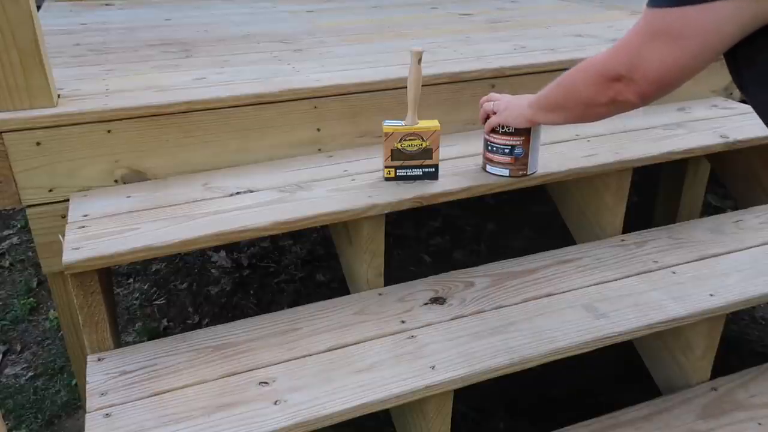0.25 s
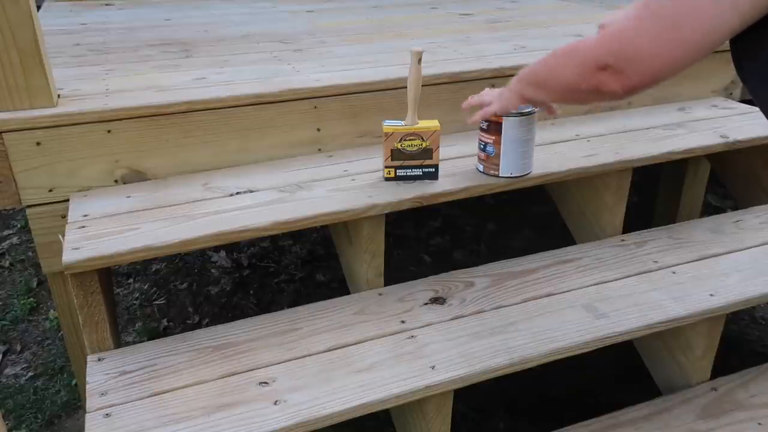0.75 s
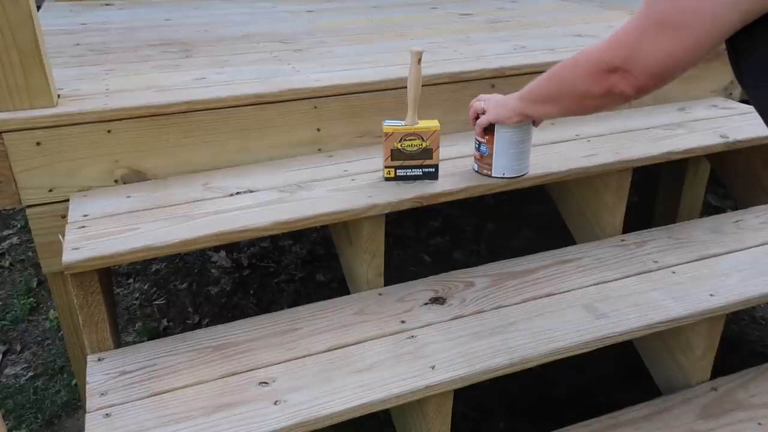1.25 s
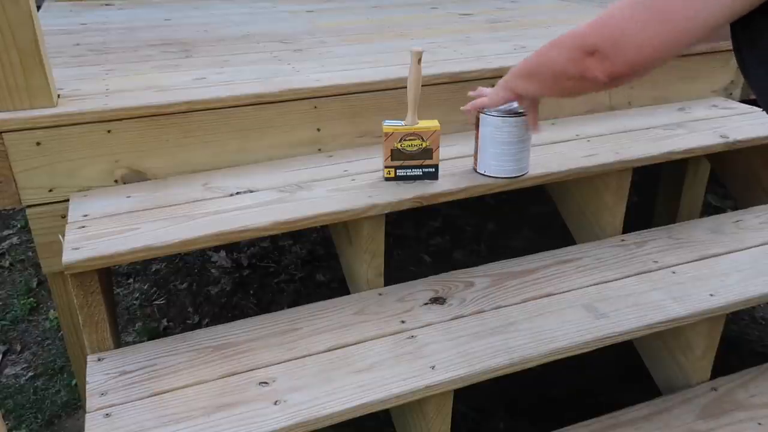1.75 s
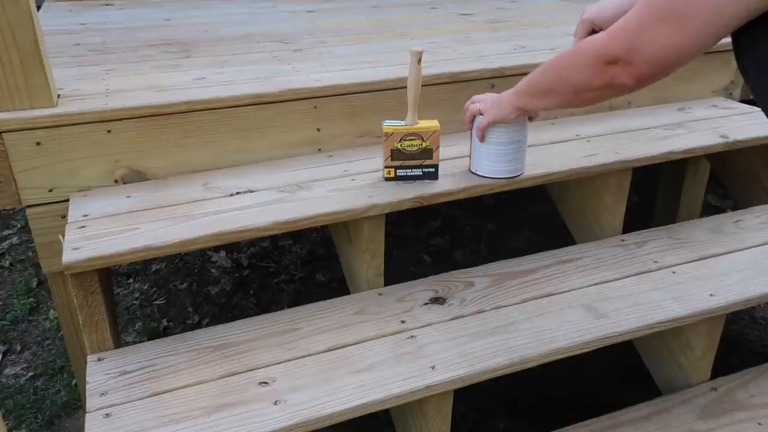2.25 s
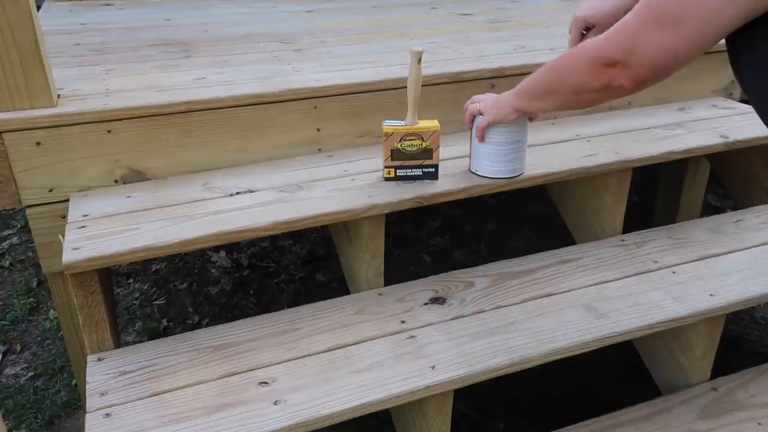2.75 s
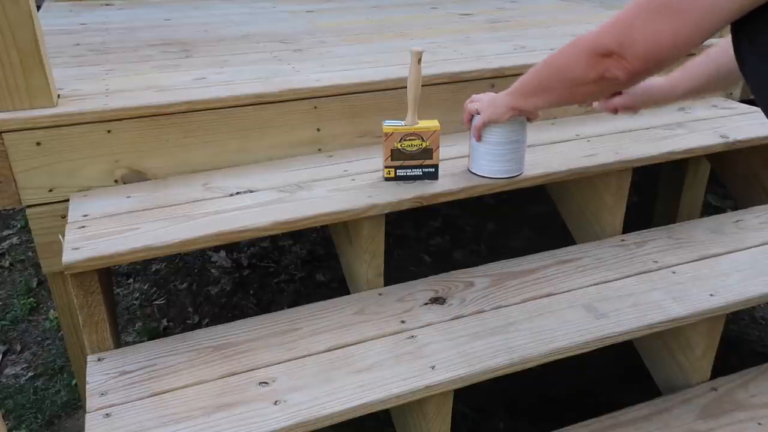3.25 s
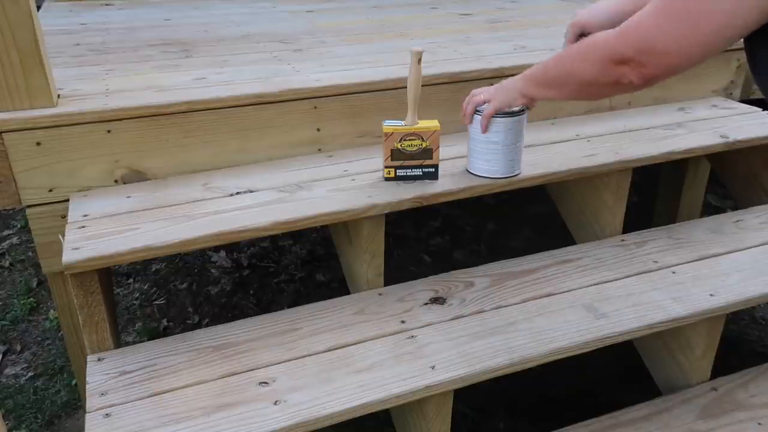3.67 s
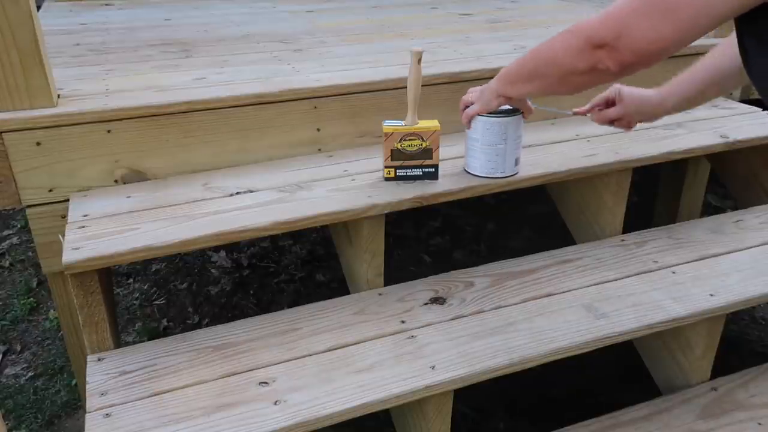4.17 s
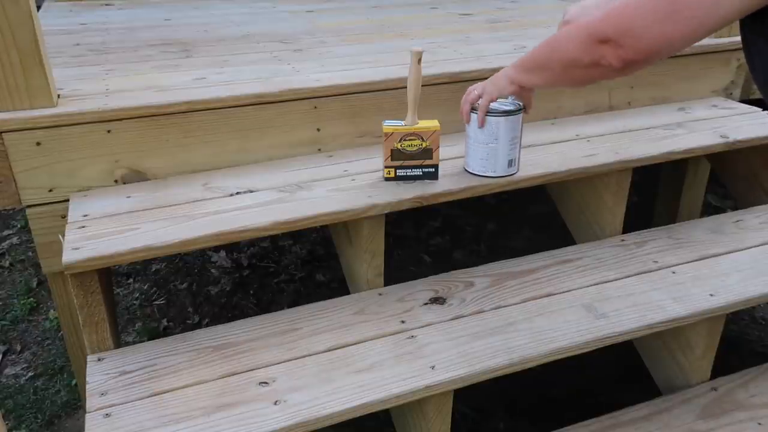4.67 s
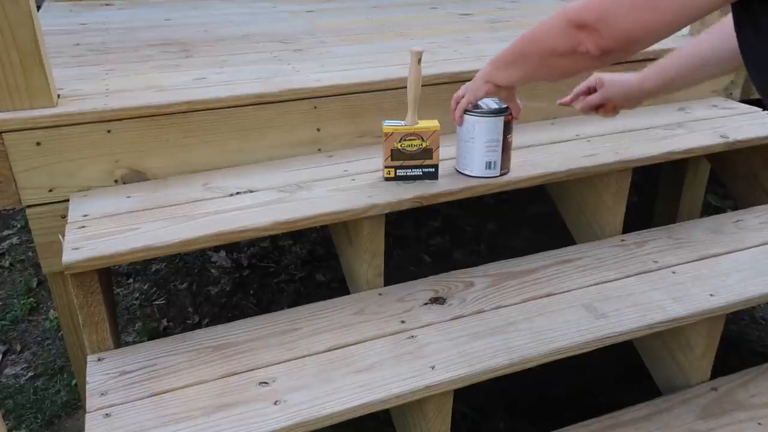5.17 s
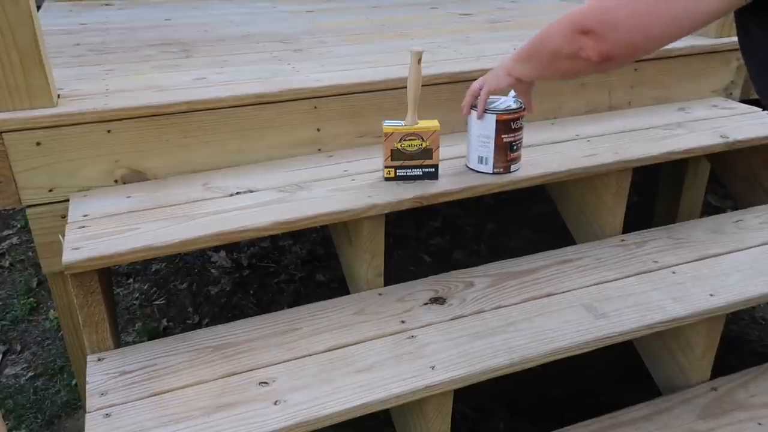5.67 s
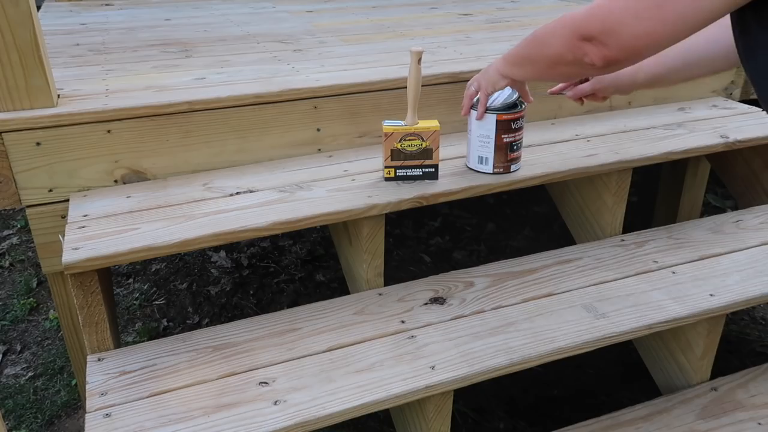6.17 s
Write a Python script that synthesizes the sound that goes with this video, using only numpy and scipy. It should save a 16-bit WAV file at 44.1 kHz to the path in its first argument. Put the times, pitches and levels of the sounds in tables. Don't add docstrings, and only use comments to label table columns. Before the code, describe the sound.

Quiet outdoor air with distant traffic, thin high insects and light wind. At 0.24 s a tin lid springs free with a loud, sharp pop, hollow and briefly ringing, by far the loudest event. Faint rubbing follows, then the can knocks on the wooden step around 0.65 to 0.95 s, ending in a firm thud with a clink. Soft rubs at 1.7 s and small ticks near 1.95 s lead to a bright clink at 2.2 s and another at 2.5 s, with a wooden knock at 2.66 s. A low wind puff swells at 3.25 s; a knock falls at 3.4 s, then light scrapes and nudges through 5 s. At 5.35 to 5.5 s the can creaks tinnily over a wind thump, then knocks. A stronger knock at 6.0 s, scrapes and crisp metal clicks run until 6.4 s. Close stereo pickup, short hard reflection.

```python
import sys
import numpy as np
from scipy import signal
from scipy.fft import rfft, irfft
from scipy.io import wavfile
from scipy.ndimage import uniform_filter1d

SR = 44100
rng = np.random.default_rng(int(sys.argv[2]) if len(sys.argv) > 2 else 0)


def decibels_to_gain(level_db):
    exponent = np.asarray(level_db, float) / 20
    return 10 ** exponent


def bounce(signal):
    frames = np.transpose(np.atleast_2d(signal))
    limited = np.clip(frames, -1, 1)
    pcm = np.round(limited * 32767).astype(np.int16)
    wavfile.write(sys.argv[1], SR, pcm)


N = 283417
T = np.arange(N) / SR
RIM_HZ = 5230
MID_HZ, HIGH_HZ = (2500, 7000), (7000, 15000)


def on_log(hz, table):
    f, v = np.transpose(table)
    return np.interp(np.log(np.maximum(hz, 1)), np.log(np.maximum(f, 1)), v)


def colour(x, table):
    n = x.shape[-1]
    return irfft(rfft(x) * decibels_to_gain(on_log(np.fft.rfftfreq(n, 1 / SR), table)), n)


def band(x, lo_hz, hi_hz, order=2):
    sos = signal.butter(order, [lo_hz, min(hi_hz, .45 * SR)], "band", fs=SR, output="sos")
    return signal.sosfilt(sos, x)


def level(x, db):
    return x * decibels_to_gain(db) / np.sqrt(np.mean(x ** 2))


def peak(x, db):
    return x * decibels_to_gain(db) / np.max(np.abs(x))


def walk(rate):
    k = int(SR / rate)
    held = np.repeat(rng.standard_normal(N // k + 1), k)
    return 1.316 * uniform_filter1d(uniform_filter1d(held, k), k)[:N]


def ring(modes, t):
    return sum(decibels_to_gain(db) * np.sin(2 * np.pi * hz * t) * decibels_to_gain(-60 * t / t60) for hz, db, t60 in modes)


def burst(t, t60):
    return rng.standard_normal(len(t)) * decibels_to_gain(-60 * t / t60)


def add(out, x, s):
    i = int(round(s * SR))
    out[i:i + len(x)] += x[:N - i]


def jingle(t, lo_hz, hi_hz, t60, count):
    hz, db, life = rng.random((3, count))
    return ring(zip(lo_hz * (hi_hz / lo_hz) ** hz, -10 * db, t60 * (.5 + life)), t)


def contact(t, length):
    x = t / length
    return rng.standard_normal(len(t)) * x * np.exp(-3 * x)


def pressure(length, shape):
    return np.hanning(max(int(length * SR), 2)) ** (shape / 2)


def yard():
    # f/Hz, level/dB per Hz
    traffic = [(15, -68), (25, -15), (40, -30), (58, -3), (120, -1), (206, -7), (229, -5), (394, -7.5),
               (503, -8.5), (677, -14.5), (962, -17.5), (1290, -16.5), (5730, -31), (12900, -47.5),
               (16000, -57)]
    # f/Hz, level/dB
    spread = [(60, -61), (110, -20), (200, -5.5), (380, -7.5), (700, -1.5), (1290, -3.5), (2380, -5),
              (4400, -3), (8120, -2), (15000, 5)]
    # f/Hz, level/dB
    balance = [(60, 4.5), (110, 0.5), (200, -1.5), (380, 0), (700, -4.5), (1290, -2), (2380, 0),
               (4400, -1.5), (8120, 0.7), (15000, -1)]
    # f/Hz, width/Hz, level/dB
    songs = [(5730, 400, -69), (13000, 300, -86)]
    hz = np.fft.rfftfreq(N, 1 / SR)
    mid = rfft(rng.standard_normal(N)) * decibels_to_gain(on_log(hz, traffic))
    side = rfft(rng.standard_normal(N)) * decibels_to_gain(on_log(hz, traffic) + on_log(hz, spread))
    scale = decibels_to_gain(-50) / np.std(irfft(mid * (hz > 200), N))
    octave = np.log2(np.maximum(hz, 20) / 20)
    out = 0
    for k in np.arange(11):
        part = np.clip(1 - np.abs(octave - k), 0, 1)
        m, s = irfft(mid * part, N), irfft(side * part, N)
        pan_db = on_log(20 * 2. ** k, balance) * np.array([[.5], [-.5]])
        out = out + decibels_to_gain(1.24 * walk(14) + pan_db) * np.array([m + s, m - s])
    insects = 0
    for f, w, db in songs:
        song = band(rng.standard_normal((2, N)), f - w / 2, f + w / 2) * decibels_to_gain(0.8 * walk(14))
        insects = insects + level(song, db)
    return scale * out * decibels_to_gain(1.8 * walk(1.57)) + insects


def wind():
    # f/Hz, level/dB per Hz
    spectrum = [(12, -45), (20, -6.5), (60, 6.5), (118, 1.5), (286, -14.5), (397, -40), (499, -57),
                (600, -21), (780, -68), (1320, -120)]
    # middle t/s, peak level/dB, half width/s
    gusts = [(.03, -53, 0.041), (.33, -48, 0.14), (.52, -50, 0.033), (1.34, -44, 0.035), (1.52, -53, .025),
             (1.61, -39.5, 0.027), (1.86, -48.5, 0.048), (2.17, -51, 0.037), (2.33, -45, 0.019),
             (2.98, -50, .05), (3.12, -54, 0.021), (3.26, -31.5, 0.077), (3.52, -56, 0.016),
             (3.82, -49, 0.057), (4.1, -45, 0.047), (4.47, -43, 0.012), (4.59, -49, 0.052),
             (4.87, -57, 0.077), (5.27, -51, 0.026), (5.385, -44, 0.023)]
    # t/s, level/dB
    breeze = [
        (0, -52),
        (2.6, -50),
        (4.2, -51.5),
        (5.5, -55),
        (6.43, -57),
    ]
    both, apart = (level(colour(rng.standard_normal(N), spectrum) * decibels_to_gain(0.6 * walk(24.8)), 0)
                   for _ in range(2))
    puffs = sum(decibels_to_gain(db) * np.exp(-((T - s) / width) ** 2) for s, db, width in gusts)
    db = 20 * np.log10(decibels_to_gain(np.interp(T, *np.transpose(breeze))) + puffs)
    share = np.clip(decibels_to_gain(-6 + 0.74 * (db + 44.5)), 0, 1.2)
    common = both * decibels_to_gain(np.array([[-.8], [.8]]))
    opposed = share * band(apart, 110, 340) * np.array([[1], [-1]])
    return decibels_to_gain(db) * (common + opposed)


def rubs():
    # t/s, peak level 2-7 kHz/dB, blade ring f/Hz, level above 7 kHz/dB, length/s
    slides = [(0.17, -54, 2600, -10, 0.022), (0.7095, -44.5, 5020, 5.5, 0.015),
              (0.87, -41.5, 3660, -4, 0.022), (1.708, -41, 2480, -4, 0.023), (1.75, -37, 2480, -10, 0.013),
              (2.049, -47.5, 3500, -15, 0.04), (2.218, -57, 3820, -5, 0.016), (2.368, -45, 2470, -12, 0.01),
              (2.655, -44, 2220, -8, 0.0083), (2.943, -51, 2950, -7, 0.033), (3.5, -48, 3690, -14, 0.041),
              (3.753, -47.5, 4800, -10, 0.03), (4.42, -50, 4500, -26, 0.018), (5.42, -47, 2270, -8, 0.0067),
              (5.926, -41, 2400, -11, 0.01), (6.126, -42.5, 2270, -13, 0.0076),
              (6.162, -46, 3200, -8, 0.037), (6.287, -41.5, 2550, -21, 0.011)]
    out, t = np.zeros(N), T[:SR // 6]
    for s, db, blade_hz, top_db, length in slides:
        force = contact(t, length) * decibels_to_gain(1.2 * rng.exponential(size=len(t)))
        modes = [(blade_hz, 0, .018), (1.91 * blade_hz, -11, .008), (RIM_HZ, -11, .008)]
        sung = signal.fftconvolve(force, ring(modes, t[:2000]))[:len(t)]
        rasp = peak(sung, -1) + peak(band(force, 1500, 7000), -5)
        add(out, peak(rasp, db) + peak(band(force, *HIGH_HZ), db + top_db), s)
    return out


def knocks():
    # t/s, peak level/dB, board ring f/Hz, can wall minus board level/dB, contact time/s
    blows = [(0.237, -26, 370, 0.5, 0.014), (0.656, -29.5, 340, -3.5, 0.032),
             (0.723, -32.5, 297, -5.5, 0.038), (0.857, -28.5, 316, -5.5, 0.051),
             (0.886, -38, 400, -8, 0.0053), (0.955, -19.5, 303, 0.5, 0.028), (2.188, -37, 447, -6, 0.03),
             (2.6583, -24.5, 292, 0, 0.0054), (3.3905, -26, 368, -1.5, 0.028),
             (3.637, -31.5, 278, -5.5, 0.034), (3.993, -37, 370, 2, 0.021), (5.4954, -27, 402, -11, 0.0069),
             (5.922, -30, 350, -6, 0.035), (5.986, -20.5, 374, -4, 0.027), (6.391, -38, 293, 5, 0.004)]
    # t/s, peak level/dB, board ring f/Hz
    nudges = [(1.971, -47, 390), (2.533, -38.5, 432), (2.62, -36, 287), (2.975, -36, 284),
              (3.687, -37.5, 326), (4.039, -35.5, 306), (4.432, -36.5, 370), (4.46, -49, 282),
              (4.508, -37.5, 385), (4.835, -37.5, 395), (5.005, -39, 357)]
    # f/Hz, level/dB, t60/s
    wood = [(290, 0, .07), (335, -2, .07), (402, -2, .07), (470, -4, .05), (600, -3, .06), (690, -2, .06),
            (800, -6, .045)]
    can_hz, nudge_can_db, nudge_s = 658.5, -4.5, 0.02
    out, t = np.zeros(N), T[:SR // 4]
    for s, db, board_hz, can_db, length in blows + [row + (nudge_can_db, nudge_s) for row in nudges]:
        spot_db = -5 + 1.0 * rng.standard_normal(len(wood))
        others = [(hz, d + u, t60) for (hz, d, t60), u in zip(wood, spot_db)]
        force = rng.standard_normal(4000) * np.exp(-(t[:4000] / length) ** 2)
        force *= np.minimum(t[:4000] / 0.0041, 1)
        force[:40] += 1.18 * np.hanning(40)
        board = signal.fftconvolve(ring([(board_hz, 0, .065)] + others[:4], t), force)
        can = signal.fftconvolve(ring([(can_hz, -2, .04)] + others[4:], t), force)
        add(out, peak(band(board, 305, 690), db) + peak(band(can, 310, 4700), db + can_db), s)
        add(out, peak(band(force, 220, 960), db - 13.5), s)
    return out


def pop():
    # t/s, peak level/dB
    release = [
        (0.2379, -2.5),
    ]
    # f/Hz, level/dB, t60/s
    lid = [(627, 1, 0.18), (635, 1.5, 0.16), (876, -6, 0.07), (896, -15, .22), (1147, -9, 0.045),
           (1295, -15, 0.22), (2170, -22, 0.05), (1800, -19, 0.05), (1390, -2, .03), (2850, -16, 0.07),
           (4150, -30, 0.05), (2420, -18, 0.04), (7400, -28, 0.06), (9000, -34, 0.034)]
    # f/Hz, width/Hz, level/dB
    snap = [(630, 95, -16), (1350, 89, 6.5), (2160, 140, 1.5), (2480, 240, -5), (3060, 120, -7.5),
            (5050, 360, -7), (6400, 440, -5), (7410, 310, -7), (8800, 240, -8), (4100, 190, -17),
            (10400, 235, -5.5), (10700, 190, -18), (13000, 300, -33.5), (13900, 330, -36.5)]
    (s, db), = release
    out, t = np.zeros(N), T[:SR // 2]
    noise = rng.standard_normal(len(t))
    partials = [(hz, d + 20 * np.log10(w / 200), 4.7 / w) for hz, w, d in snap]
    crack = peak(ring(partials, t), 0.99)
    crack += peak(band(noise * decibels_to_gain(-60 * t / 0.013), 1500, 10000), -7.5)
    sound = (crack + peak(ring(lid, t), -7)) * np.minimum(t / .0008, 1)
    add(out, decibels_to_gain(db) * sound, s)
    add(out, decibels_to_gain(db - 6) * crack, s + .0012)
    shiver = band(noise[::-1], 750, 3100, order=1) * decibels_to_gain(-60 * t / 0.077) * np.minimum(t / 0.0043, 1)
    add(out, peak(shiver, -23), s + .006)
    return out


def nicks():
    # t/s, peak level/dB, low edge
    # f/Hz, high edge f/Hz
    clicks = [(.2385, -12, 1500, 12000), (.2495, -28, 1500, 13000), (.879, -46, 2000, 13000),
              (.9565, -36, 1500, 12000), (.9675, -46, 5500, 12000), (1.9735, -43, 1500, 13000),
              (2.189, -40, 1200, 14000), (2.2005, -46, 4000, 13000), (2.5248, -42, 1200, 13000),
              (2.5365, -45, 5500, 14000), (4.505, -51, 7500, 11500), (5.9245, -47, 4000, 9000),
              (5.931, -46, 1200, 9000), (5.9857, -34, 1200, 13000), (5.9875, -37, 1200, 11000),
              (5.999, -47, 4000, 9000), (6.3915, -34, 1200, 12000), (6.402, -42, 7000, 13000)]
    out, hit = np.zeros(N), np.zeros(400)
    hit[0] = 1
    for s, db, lo_hz, hi_hz in clicks:
        add(out, peak(band(hit, lo_hz, hi_hz), db), s)
    return out


def taps():
    # t/s, peak level/dB, ring f/Hz
    touches = [(.2485, -29, 2200), (.249, -29, 631), (.2505, -34, 3000), (.955, -55, 870),
               (.9566, -46, 3670), (1.9727, -40, 6900), (1.973, -38, 5620), (1.974, -47, 1380),
               (1.98, -44.5, 685), (1.99, -49, 720), (2.1873, -45, 940), (2.196, -48, 640),
               (2.199, -45, 950), (2.1995, -48, 2800), (2.207, -50, 640), (2.526, -41, 5200),
               (2.5291, -47.5, 940), (2.5365, -48, 6600), (2.672, -44, 600), (2.684, -46, 330),
               (3.3895, -45, 1100), (3.3905, -38, 650), (3.3905, -48, 4500), (3.391, -46, 2300),
               (3.396, -49, 1500), (5.4955, -41, 650), (5.4975, -44, 290), (5.508, -47, 540),
               (5.518, -49, 450), (5.925, -45, 1150), (5.9848, -35, 5790), (5.9853, -36.5, 6720),
               (5.9855, -42, 2300), (5.9855, -37, 1500), (5.999, -39, 360), (6.001, -44, 620),
               (6.008, -40, 330), (6.012, -39, 400), (6.012, -44, 640), (6.17, -50, 950),
               (6.2322, -50, 5840), (6.2325, -38, 1110), (6.2326, -39, 5006), (6.3907, -32, 1375),
               (6.391, -32, 6670), (6.3916, -33, 9600), (6.3916, -36, 7800)]
    out, t = np.zeros(N), T[:SR // 8]
    for s, db, hz in touches:
        t60 = 0.039 * (1200 / hz) ** 0.74
        add(out, ring([(hz, db + 8.0, t60)], t) * np.minimum(t / 0.00094, 1), s)
    return out


def chatter():
    # start t/s, length/s, f/Hz, level/dB
    partials = [(.278, 0.027, 7400, -67), (0.358, 0.087, 7400, -71), (0.329, 0.1, 4910, -73),
                (0.701, 0.029, 7240, -67), (.872, .05, 5170, -63), (.874, 0.018, 4710, -59),
                (.875, 0.033, 7410, -64), (.885, 0.026, 2730, -65), (0.953, 0.022, 2780, -49.5),
                (1.711, 0.012, 8100, -65.5), (1.738, .02, 4580, -68), (1.76, .02, 5800, -73),
                (2.194, 0.016, 2850, -55), (2.531, .04, 2740, -61), (2.579, .05, 3100, -64),
                (2.642, 0.026, 3770, -67), (3.627, 0.017, 1500, -63), (5.352, 0.024, 2400, -61),
                (5.39, .075, 3600, -62), (5.399, 0.03, 9630, -60), (5.404, 0.035, 4800, -59),
                (5.432, 0.037, 5500, -62), (5.92, .008, 5500, -57.5), (5.924, 0.015, 3280, -60),
                (6.151, 0.028, 5850, -59.5), (6.16, 0.049, 5080, -59), (6.167, .045, 4700, -59),
                (6.169, .02, 2300, -62), (6.191, 0.018, 2350, -53.5), (6.228, 0.057, 2420, -57),
                (6.12, 0.044, 2260, -63), (4.426, .04, 4400, -63), (4.432, 0.028, 5370, -63),
                (6.393, 0.016, 9480, -58), (6.393, 0.014, 3800, -56), (6.268, 0.031, 6000, -66),
                (6.271, .03, 6400, -65), (6.282, 0.018, 4400, -64)]
    out, t = np.zeros(N), T[:1500]
    for s, length, hz, db in partials:
        slips = rng.standard_normal(8000) * decibels_to_gain(3.0 * rng.exponential(size=8000))
        push = pressure(length, 0.79)
        rung = signal.fftconvolve(push * slips[:len(push)], ring([(hz, 0, 0.015)], t))
        add(out, level(rung, db), s)
    return out


def scrapes():
    # start t/s, length/s, rasp level 1.2-6.1 kHz/dB, hiss level 3.7-15 kHz/dB
    strokes = [(.33, 0.11, -60.5, -78), (.63, 0.15, -58, -68), (.84, 0.13, -66, -70), (4.42, .05, -61, -66),
               (3.375, .025, -54, -60), (5.97, .02, -56, -58), (.87, 0.067, -66, -63),
               (2.36, 0.14, -60.5, -78), (2.6, 0.13, -57, -74), (3.48, 0.095, -59, -60.5),
               (3.78, .13, -59.5, -78), (4.39, 0.08, -57.5, -59), (4.79, 0.062, -57.5, -71),
               (5.34, 0.16, -50, -52), (5.4, 0.045, -68, -50), (5.9, 0.05, -57, -58),
               (5.96, 0.038, -51, -58), (6.0, .14, -63, -73), (6.14, 0.084, -60, -59),
               (6.23, 0.097, -62, -56), (6.34, 0.054, -60, -78)]
    # start t/s, length/s, can wall hum level/dB, board drone level/dB
    drags = [(.65, 0.04, -44, -42.5), (.88, 0.034, -54, -42), (1.68, 0.075, -51.5, -58),
             (3.47, 0.048, -58, -50), (4.41, 0.095, -62, -51.5), (4.76, 0.068, -55, -48.5),
             (5.345, 0.035, -52, -44), (5.385, 0.11, -52, -53), (5.5, 0.061, -55, -46),
             (6.0, 0.12, -51, -47), (6.1, 0.07, -49.5, -42.5), (6.24, 0.031, -59, -50)]
    # f/Hz, width/Hz, level/dB
    resonances = [(2270, 740, 24.5), (3440, 59, 10), (3710, 32, 14), (4660, 330, -11), (4500, 160, 12),
                  (5480, 53, -28.5), (7600, 33, 3), (9600, 91, -1), (10600, 14, 6), (13500, 47, -43)]
    hum_hz, drone_hz, drone_width_hz = 685, 390, 57
    slips = rng.standard_normal(N) * decibels_to_gain(1.5 * rng.exponential(size=N) + 1.5 * walk(120))
    tin = sum(decibels_to_gain(db) * band(slips, hz - w / 2, hz + w / 2, order=1) * np.sqrt(300 / w)
              for hz, w, db in resonances)
    tin = level(tin, 0) + level(slips, 0.84)
    hum = np.sin(2 * np.pi * np.cumsum(hum_hz * (1 + .014 * walk(110))) / SR) * decibels_to_gain(2.0 * walk(50))
    hum += level(band(slips, 0.8 * hum_hz, 0.96 * hum_hz), 0.0)
    drone = band(slips, drone_hz - drone_width_hz / 2, drone_hz + drone_width_hz / 2, order=1)
    rasp, hiss = band(tin, 1200, 6100), band(tin, 3700, HIGH_HZ[1])
    rasp, hiss, hum, drone = [level(x, 0) for x in (rasp, hiss, hum, drone)]
    out = np.zeros(N)
    for moves, pair, shape in ((strokes, (rasp, hiss), 1.04), (drags, (hum, drone), 0.29)):
        for s, length, *dbs in moves:
            push, i = pressure(length, shape), int(round(s * SR))
            add(out, push * sum(x[i:i + len(push)] * decibels_to_gain(db) for x, db in zip(pair, dbs)), s)
    return out


def ticks():
    # t/s, peak level 2.5-7 kHz/dB, blade ring f/Hz, level below 2.5 kHz/dB, above 7 kHz/dB
    touches = [(0.8004, -59, 2900, -6, 10.5), (0.9558, -26.5, 2710, -11, -2), (1.912, -38, 2890, 2, 3.5),
               (1.9727, -37.5, 4400, -2, 4.5), (2.1892, -30, 3770, -1, -6), (2.5245, -39, 3710, -2, 5),
               (3.391, -43.5, 2690, 10, 1), (3.6835, -50.5, 3060, 11.5, 4), (4.5044, -49.5, 3080, -9, 9),
               (4.639, -57, 2720, -6, 8), (4.975, -45.5, 2840, 10, -4), (5.5674, -50, 2800, 8, 2),
               (5.9852, -30, 2400, 1, 3), (6.232, -38.5, 2420, 6, 7.5), (6.3913, -25.5, 3740, 6, -1.5)]
    out, t = np.zeros(N), T[:SR // 8]
    for s, db, blade_hz, low_db, top_db in touches:
        touch = burst(t, .016) * np.minimum(t / .001, 1)
        mid = peak(band(touch, *MID_HZ, order=3), -4) + ring([(blade_hz, -4, .02)], t)
        mid += peak(jingle(t, *MID_HZ, 0.032, count=8), -1)
        top = peak(band(touch, *HIGH_HZ, order=3), -3) + ring([(RIM_HZ, -6, .016)], t)
        top += peak(jingle(t, *HIGH_HZ, 0.016, count=10), -1)
        low = band(burst(t, 0.061), 450, 2760)
        add(out, peak(mid, db) + peak(top, db + top_db) + peak(low, db + low_db - 4.5), s)
    return out


def clinks():
    # t/s, peak level/dB, tilt/dB per octave
    blows = [
        (0.9556, -33, -1),
        (1.912, -45, -4),
        (2.1894, -25.5, -3.5),
        (2.2175, -44, -3),
        (2.5245, -29.5, 2),
        (3.39, -42, -1),
    ]
    # f/Hz, level/dB, t60/s
    blade = [(1755, -15, .03), (2830, -8.5, 0.023), (3674, 0.5, 0.018), (5040, -6.5, 0.023),
             (6920, -8, .012), (8100, -6, 0.0096), (10460, -14, .015), (11860, -12, .01)]
    out, t = np.zeros(N), T[:SR // 10]
    for s, db, tilt_db in blows:
        modes = [(hz, d + tilt_db * np.log2(hz / 4000), t60) for hz, d, t60 in blade]
        add(out, peak(ring(modes, t) * np.minimum(t / 0.0012, 1), db), s)
    return out


def eddies():
    # middle t/s, f/Hz, peak level/dB, half width/s
    swirls = [
        (1.345, 67.6, -33, 0.028),
        (4.1, 101, -37.5, 0.018),
        (4.59, 50, -39, 0.031),
        (5.383, 78, -30.5, 0.016),
    ]
    return sum(decibels_to_gain(db) * np.exp(-((T - s) / width) ** 2) * np.sin(2 * np.pi * hz * (T - s))
               for s, hz, db, width in swirls)


def creak():
    # t/s, f/Hz, level/dB
    song = [
        (5.342, 650, -56),
        (5.366, 690, -44),
        (5.38, 700, -41),
        (5.387, 687, -46),
        (5.395, 680, -42),
        (5.42, 675, -44),
        (5.434, 680, -40),
        (5.462, 678, -38),
        (5.49, 670, -52),
    ]
    s, hz, db = np.transpose(song)
    tremble = walk(70)
    pitch_hz = np.interp(T, s, hz) * (1 + .012 * tremble)
    tone = np.sin(2 * np.pi * np.cumsum(pitch_hz) / SR) * decibels_to_gain(1.6 * tremble[::-1])
    return np.sqrt(2) * tone * decibels_to_gain(np.interp(T, s, db, left=-120, right=-120))


def steps(x):
    # f/Hz, level/dB
    balance = [(60, 16), (110, 5), (200, -2.5), (380, 1), (700, -6), (1290, -4.5), (2380, -1), (4400, -1),
               (8120, -0.5), (15000, -0.5)]
    port_lag_s = 2e-5
    wall_s, wall_db, tail_db, tail_t60_s = .0118, -12.5, -17.5, 0.05
    t, hz = T[:SR // 3], np.fft.rfftfreq(N, 1 / SR)
    out, shared = [], burst(t, tail_t60_s)
    echo = np.diff(burst(t[:60], .001))
    for side in (.5, -.5):
        tail = (shared + 0.34 * burst(t, tail_t60_s)) * np.minimum(t / 0.017, 1) ** 2
        tail = band(tail, 280, 7000, order=1)
        answer = decibels_to_gain(tail_db) * tail / np.sqrt(np.sum(tail ** 2))
        add(answer, decibels_to_gain(wall_db) * echo / np.sqrt(np.sum(echo ** 2)), wall_s)
        answer = band(answer, 1300, 20000, order=1)
        answer[0] += 1
        port = decibels_to_gain(side * on_log(hz, balance)) * np.exp(-2j * np.pi * hz * side * port_lag_s)
        out.append(irfft(rfft(signal.fftconvolve(x, answer)[:N]) * port, N))
    return np.array(out)


def scene():
    blade = ticks() + taps() + clinks() + rubs() + chatter() + nicks()
    can = pop() + knocks() + scrapes() + creak()
    return steps(blade + can) + wind() + eddies() + yard()


def roll_off(x):
    return signal.sosfilt(signal.butter(12, 16150, fs=SR, output="sos"), x)


def record(dry):
    dull = signal.sosfilt(signal.butter(8, 14300, fs=SR, output="sos"), dry)
    return roll_off(dull)


dry = scene()
out = record(dry)
bounce(out)
```